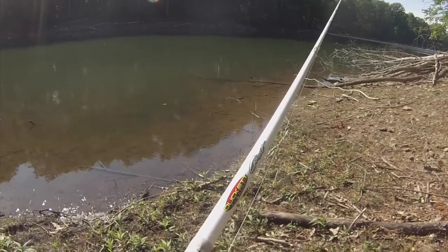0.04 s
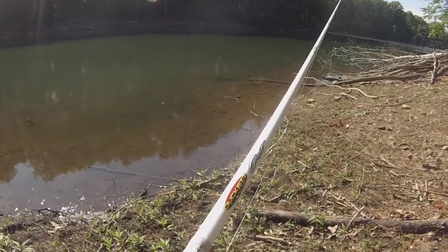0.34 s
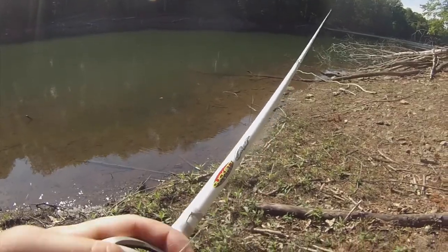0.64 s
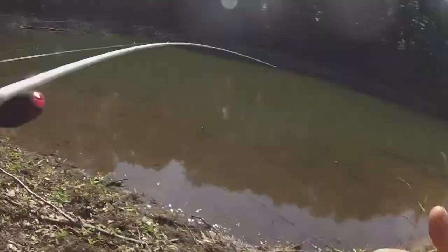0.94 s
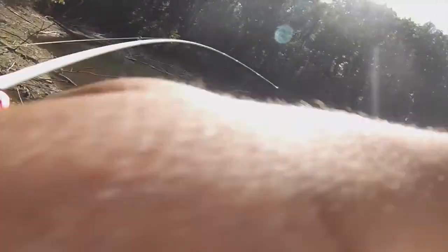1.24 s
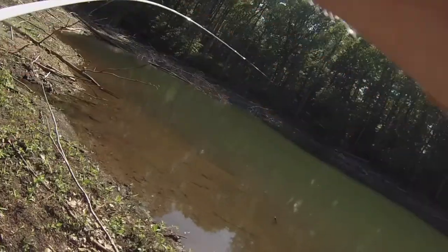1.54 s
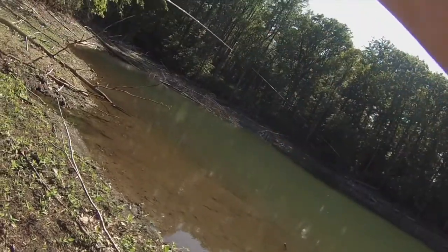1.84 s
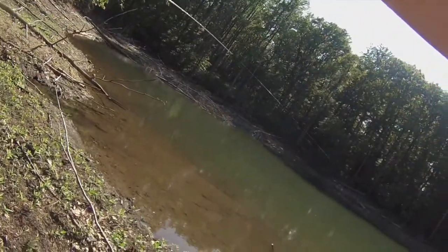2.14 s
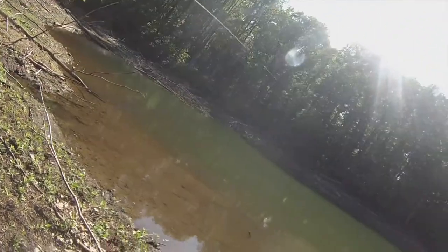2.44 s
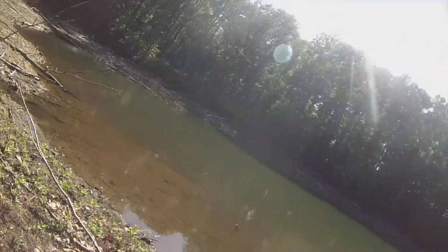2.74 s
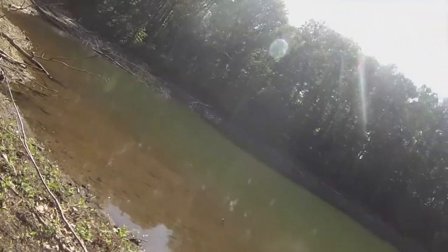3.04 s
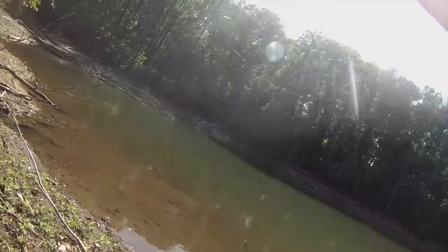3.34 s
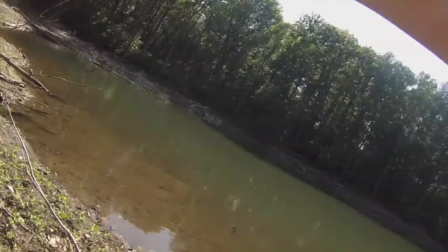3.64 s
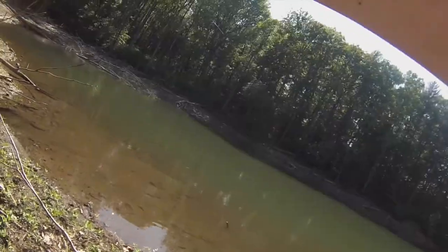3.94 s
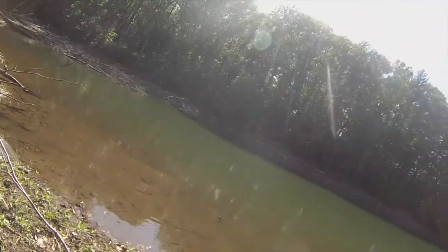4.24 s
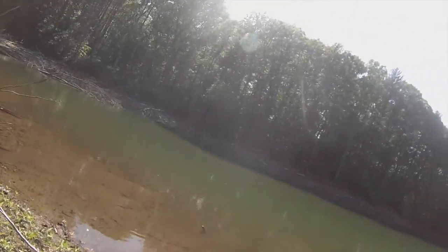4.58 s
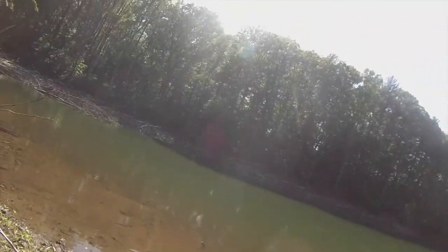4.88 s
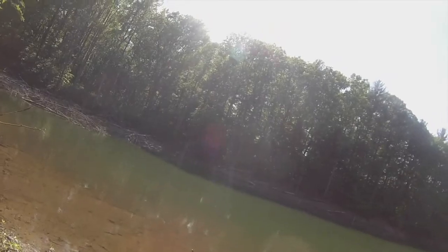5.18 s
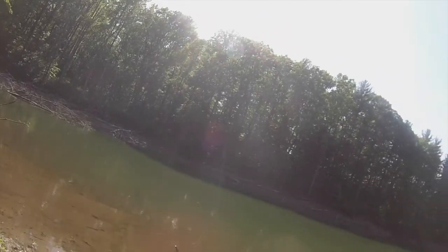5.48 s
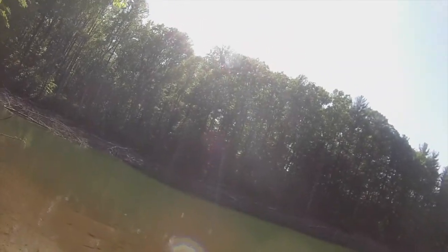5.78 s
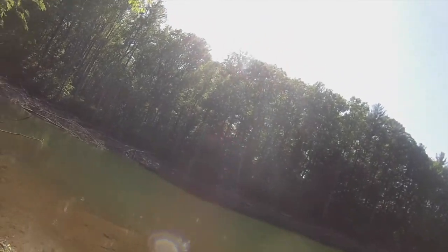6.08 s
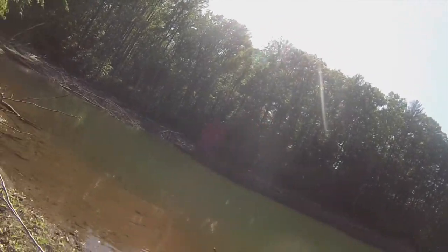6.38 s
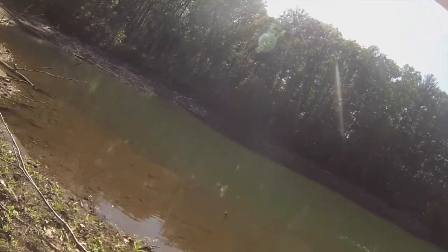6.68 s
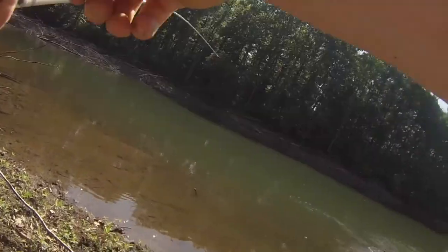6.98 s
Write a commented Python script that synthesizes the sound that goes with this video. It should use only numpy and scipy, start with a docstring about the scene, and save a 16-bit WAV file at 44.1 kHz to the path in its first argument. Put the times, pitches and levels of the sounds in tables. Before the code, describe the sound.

A fishing rod's handle and an arm knock sharply on the microphone's plastic case in two quick flurries, mixed with dull bumps and small reel ticks. Clothes swish and scrape across the case in three bouts. Between the second and third, the reel's spool gives a brief, thin whirr, and one more knock follows. Everything is very close and dry, over a faint woodland hush and light breeze rumble.

```python
"""On a quiet pond bank, an angler hooks a fish and plays it, with a camera strapped to the chest.
The rod's handle and an arm knock on the camera's plastic case in two quick flurries, with dull bumps
and ticks from the reel. Clothes swish and scrape over the case in three bouts of work with the rod.
The reel's spool whirrs briefly, and behind it all is a faint outdoor hush."""
import sys
import numpy as np
from scipy import signal
from scipy.fft import irfft
from scipy.io import wavfile
from scipy.ndimage import uniform_filter1d

SR = 44100
rng = np.random.default_rng(int(sys.argv[2]) if len(sys.argv) > 2 else 0)


def wav_record(signal):
    """Record a signal, one row per channel, as 16-bit PCM in the file named by sys.argv[1]."""
    frames = np.transpose(np.atleast_2d(signal))
    bounded = np.clip(frames, -1, 1)
    # unit amplitude maps onto the largest positive 16-bit level
    quanta = np.round(bounded * 32767).astype(np.int16)
    wavfile.write(sys.argv[1], SR, quanta)


N = 318346
TIME = np.arange(N) / SR
TAPS = 4096  # samples in one short sound, such as a knock
AGE = np.arange(TAPS) / SR  # seconds since that sound began
TOP_HZ = 15600  # treble above this is cut away


def knocks():
    """Each knock makes the plastic case ring with many tones; softer blows lose the high ones."""
    # Blows on the case. Each row: start in seconds, level in dB, treble limit in Hz,
    # looseness of the contact from 0 to 1, pitch in Hz that the struck spot favours.
    blows = [(0.8879, 0.5, 3020, 0.27, 1030), (.923, -26, 1440, 0.16, 880), (1.01, -11.5, 2870, 0.6, 1500),
             (1.0176, 3.5, 7500, 0.45, 685), (1.0208, -14, 2600, .4, 740), (1.028, -4.5, 3400, 0.5, 2130),
             (1.0987, -18, 1600, 0.8, 960), (1.135, -6, 3220, 0.23, 1410), (1.1502, -2, 4300, 0.47, 1400),
             (1.1943, -0.5, 2430, 0.07, 880), (1.275, -7, 2830, 0.23, 804), (1.3489, -0.5, 2660, 0.3, 1030),
             (1.5902, -15.5, 1870, 1, 1300), (1.612, -23, 4000, 0.3, 1010),
             (1.757, -21.5, 2180, 0.65, 1210), (1.7608, -21, 2320, 0.7, 710),
             (2.634, -28.5, 1720, 0.7, 910), (2.759, -28, 1810, 0.9, 1200), (3.2555, -22.5, 2550, 0.6, 800),
             (3.2972, -.5, 4140, .47, 3150), (3.4592, -7, 5100, 0.7, 1680), (3.489, -17, 2340, 0.35, 870),
             (3.551, -19, 2980, 0.6, 2400), (3.583, -10, 2640, 1, 2180), (3.677, -15.5, 1780, 0.45, 1210),
             (3.729, -27, 4070, 0.1, 3320), (5.151, -28, 2400, 1, 726), (5.172, -32, 2200, 1, 720),
             (5.988, -7, 4040, 0.38, 1070), (6.2098, -25, 1980, 0.4, 1150), (6.987, -24.5, 1930, 1, 1170),
             (6.999, -25, 2060, 1, 850)]
    # The case's own tones, low to high. Each row: pitch in Hz, level in dB, seconds to fade by 60 dB.
    case_tones = [(683, -6, 0.022), (787, 0, 0.01), (1279, -3.5, 0.011), (1790, -5.5, 0.014),
                  (2203, -5, 0.015), (2457, -3.5, 0.01), (2994, -10, 0.0085), (3244, -20, 0.04),
                  (3535, -15, 0.019), (4020, -12.5, 0.0047), (5180, -11, 0.0097), (6650, -14.5, 0.012),
                  (9040, -11, 0.016)]
    hz, db, fade_s = np.transpose(case_tones)[:, :, None]
    sign = (-1) ** np.arange(len(hz))[:, None]  # neighbours start opposite ways, so the ring swells
    out = np.zeros(N)
    for start, level_db, bright_hz, loose, spot_hz in blows:
        place, grip = rng.standard_normal((2, *hz.shape))  # no two blows ring quite alike
        favour_db = 3.5 * np.exp(-(np.log(hz / spot_hz) / 0.2) ** 2)
        fade_db = 60 * AGE / (fade_s * (0.68 + 0.55 * loose))
        tones = sign * np.sin(2 * np.pi * hz * (1 + 0.025 * grip) * AGE)
        ring = (gain_of(db + favour_db + 1.43 * place - fade_db) * tones).sum(0)
        ring = cut(cut(ring, 633, "high", order=4), bright_hz, "low", order=4)
        ring = peaked(signal.fftconvolve(ring, contact(loose))[:TAPS])
        nudge = peaked(cut(cut(burst(0.032), 410, "low"), 170, "high"))  # the whole case moves too
        knock = ring + gain_of(-33.5) * nudge
        add(out, start - 0.0005, gain_of(level_db - 1) * knock)  # early, as the wave must cross the case
    return out


def contact(loose):
    """A blow and its bounce cross the case as bending waves, treble first; a loose contact chatters."""
    hz = np.fft.rfftfreq(TAPS, 1 / SR)
    travel_s = 0.000992 * np.sqrt(1000 / (hz + 300))
    bounce_s = 0.000939 * (1 + 0.13 * rng.standard_normal())
    pair = 1 + 0.33 * np.exp(-2j * np.pi * hz * bounce_s)
    blow = irfft(pair * np.exp(-2j * np.pi * np.cumsum(travel_s) * hz[1]), TAPS)
    return blow + 1.46 * loose * burst(0.03) + gain_of(-11.5) * burst(0.029)


def bumps():
    """Padded blows give a short, hollow tone that sags in pitch; the low ones rustle more."""
    # The heavier bumps. Each row: start in seconds, level in dB, rough pitch in Hz.
    heavy_bumps = [(1.169, -21.5, 306), (1.229, -22, 392), (1.324, -20, 380), (1.384, -25, 400),
                   (2.875, -21, 1237), (3.122, -25, 594), (3.345, -27, 375), (3.676, -14.5, 490),
                   (4.614, -28.5, 397), (5.338, -30, 990), (5.696, -23.5, 1070), (6.153, -27, 740),
                   (6.16, -24, 347), (6.207, -16.5, 1115), (6.359, -20.5, 1120), (6.463, -26, 670),
                   (6.483, -24, 368), (6.539, -27.5, 280)]
    swell = (1 - np.exp(-AGE / 0.00049)) * np.exp(-AGE / 0.0029)
    sag = 0.863 + 0.17 * np.exp(-AGE / 0.0084)
    out = np.zeros(N)
    for start, level_db, hz in heavy_bumps + jostles():
        tone = np.sin(2 * np.pi * np.cumsum(hz * sag) / SR)
        rustle = cut(cut(burst(0.048), hz * 0.93, "low", order=3), hz * 1.05, "high")
        bump = peaked(swell * tone) + 200 / hz * peaked(rustle)
        add(out, start, gain_of(level_db - 3) * peaked(bump))
    return out


def jostles(per_s=11, low_hz=342, high_hz=1194, slot_s=0.02):
    """Extra rows of light bumps that come by chance, louder when the cloth presses harder."""
    slots = np.arange(0, N / SR - 0.1, slot_s)
    chance, late, softness, pitch = rng.random((len(slots), 4)).T
    start = slots + slot_s * late
    pressure_db, _ = movement(start)
    level_db = pressure_db + 13.5 - softness
    hz = low_hz * (high_hz / low_hz) ** pitch
    return list(np.transpose([start, level_db, hz])[chance < per_s * slot_s])


def ticks(bounce_s=0.0048):
    """Small hard parts of the reel and tackle catch on each other, bounce once and rattle briefly."""
    # The catches. Each row: start in seconds, level in dB, treble limit in Hz,
    # level of the bounce in dB compared with the catch.
    catches = [(1.215, -34, 9100, -3), (1.301, -29.5, 8950, -19), (1.418, -30.5, 14100, -17),
               (1.597, -19.5, 7000, -19), (1.6076, -14, 7400, 5), (2.885, -34, 11800, -20),
               (3.059, -30.5, 8060, -15), (3.7654, -31, 9500, -20), (4.612, -26, 8600, 7.5),
               (4.627, -24.5, 8200, -2.5), (4.639, -31, 6950, -5), (5.2032, -26.5, 6000, -5.5),
               (5.2307, -31, 4500, -15), (5.2723, -31, 6000, -14), (5.2958, -33, 4500, -9),
               (5.3327, -25.5, 6000, -2.5), (5.3565, -25.5, 7800, -6), (6.059, -27, 9000, 3)]
    # The tone colour of a tick. Each row: frequency in Hz, level in dB.
    tick_colour = [(120, -34), (200, -12), (761, -11), (998, -4), (1240, -4), (2800, -13.5), (3170, -3),
                   (3870, -6), (4160, -8.5), (4890, -4.5), (5450, -9.5), (6900, -16.5), (8880, -26.5),
                   (9900, -27), (15000, -37)]
    out, ring = np.zeros(N), ring_of(tick_colour)
    for start, level_db, bright_hz, bounce_db in catches:
        for at, db in (start, level_db), (start + bounce_s, level_db + bounce_db):
            snap = (burst(0.015) + gain_of(-14.5) * burst(0.095)) * (1 - np.exp(-AGE / 0.00069))
            snap += gain_of(19.5) * bright_hz / TOP_HZ * cut(snap, 10230, "high")
            tick = cut(signal.fftconvolve(snap, ring)[:TAPS], bright_hz, "low")
            add(out, at, gain_of(db - 1.5) * peaked(case_air(tick)))
    return out


def cloth():
    """Cloth rubs the case: pressure makes a swish, speed a hiss and fizz, and both a grainy scrape."""
    # The tone colours of the four layers of rubbing. Each row: frequency in Hz, level in dB.
    swish_colour = [(100, -21), (200, -7.5), (350, -1.5), (520, -2), (750, -1.5), (950, 4), (1170, 4),
                    (1500, -7.5), (2500, -20.5), (6000, -42)]
    scrape_colour = [(450, -35.5), (700, 8.5), (1100, -16), (1500, -5.5), (1800, -4), (2250, -1),
                     (2900, -5), (3350, -10.5), (4000, -22), (7000, -37.5)]
    hiss_colour = [(1500, -46.5), (3300, 6.5), (4200, 2), (4800, 0.5), (5700, -1), (7200, -5),
                   (9500, -10.5), (11000, -14.5), (13000, -17), (15500, -62)]
    fizz_colour = [(2500, -35), (5000, 11.5), (7000, 1), (9500, -2.5), (12000, -27), (15500, -22)]
    pressure_db, speed_db = movement(TIME)
    friction_db = 0.31 * pressure_db + 0.69 * speed_db
    swish = patchy(swish_colour, patch_db=4.5, flicker_db=1, streak_db=3)
    swish += 0.5 * grains(swish_colour, per_s=300, spread_db=3)
    scrape = patchy(scrape_colour, patch_db=1.5, flicker_db=4, streak_db=3.5)
    scrape += 0.79 * grains(scrape_colour, per_s=700, spread_db=1)
    crackle = grains(hiss_colour, per_s=2500, spread_db=4.5)
    hiss = patchy(hiss_colour, patch_db=3, flicker_db=4, streak_db=5.5) + 1.12 * crackle
    fizz = patchy(fizz_colour, patch_db=1.5, flicker_db=3, streak_db=6)
    layers = [(swish, 800, pressure_db + 0.26), (case_air(scrape), 2000, friction_db + 3.2),
              (case_air(hiss), 4550, speed_db + 4), (fizz, 8300, speed_db - 12)]
    out = np.zeros(N)
    for sound, centre_hz, steady_db in layers:
        power = gain_of(steady_db) ** 2 + strokes(centre_hz)
        out += evened(sound) * np.sqrt(power)
    return out


def movement(seconds):
    """How hard the cloth presses on the case and how fast it slides at the given times, both in dB."""
    # Three bouts of work with the rod. Each row: time in seconds, pressure in dB, sliding speed in dB.
    hook_set = [(.76, -59, -77), (.87, -51.5, -61), (.95, -47.5, -62), (1.06, -42, -52), (1.2, -41, -64),
                (1.36, -42.5, -65), (1.45, -47.5, -65.5), (1.76, -51.5, -59.5), (1.85, -56.5, -69.5)]
    wind_in = [(2.52, -63, -72.5), (2.58, -52.5, -63), (3.05, -51, -59), (3.28, -45, -56.5),
               (3.47, -39.5, -56), (3.76, -38.5, -57.5), (3.99, -49.5, -60.5), (4.26, -52.5, -62.5),
               (4.33, -58, -69.5)]
    lift = [(5.57, -63, -71), (5.83, -42.5, -67), (6.039, -46, -64), (6.08, -39, -59), (6.36, -40.5, -53),
            (6.64, -42.5, -54.5), (6.77, -49.5, -57), (7.06, -45.5, -61.5), (7.22, -49, -60.5)]
    at, pressure_db, speed_db = np.transpose(hook_set + wind_in + lift)
    return np.interp(seconds, at, pressure_db), np.interp(seconds, at, speed_db)


def strokes(layer_hz):
    """Folds of cloth slip past, each adding a swell of power, most to the layers near its own pitch."""
    # The folds. Each row: loudest moment in seconds, rise time in seconds, level in dB, pitch in Hz.
    folds = [(0.801, 0.026, -50.5, 1820), (.9, .06, -45, 1730), (1.002, 0.051, -40, 1780),
             (1.05, 0.16, -58, 9000), (1.399, 0.017, -34.5, 2630), (1.401, .025, -43, 12000),
             (1.622, 0.075, -40, 1210), (1.766, 0.048, -38.5, 800), (2.14, 0.065, -57.5, 2100),
             (2.345, 0.063, -55, 1700), (2.445, 0.029, -55, 2320), (2.572, .025, -62, 9000),
             (2.638, 0.14, -47.5, 1970), (2.85, 0.044, -49.5, 2200), (3.205, .06, -41, 2400),
             (3.439, 0.04, -35.5, 2300), (3.674, 0.052, -44.5, 5960), (3.937, 0.057, -46.5, 5100),
             (5.166, 0.063, -48, 750), (5.286, .035, -41.5, 1270), (5.355, 0.064, -41.5, 1070),
             (5.67, 0.027, -53.5, 1700), (6.068, 0.013, -39, 7550), (6.068, .025, -36.5, 700),
             (6.103, 0.049, -46, 4300), (6.21, 0.067, -49.5, 3800), (6.344, 0.034, -46, 4000),
             (6.644, 0.057, -48.5, 6000)]
    power = np.zeros(N)
    for middle, rise_s, db, hz in folds:
        swell = signal.windows.hann(round(2 * rise_s * SR))
        octaves_away = abs(np.log2(hz / layer_hz))
        add(power, middle - rise_s, (swell * gain_of(db + 2 - 10.5 * octaves_away ** 1.24)) ** 2)
    return power


def grains(colour, per_s, spread_db):
    """Fibres make tiny slips of uneven size at random times, each ringing with the same tone colour."""
    size = gain_of(spread_db * np.minimum(rng.exponential(1, N), 4)) * rng.choice([-1, 1], N)
    slips = size * (rng.random(N) < per_s / SR)
    return evened(signal.oaconvolve(slips, ring_of(colour))[:N])


def case_air(x):
    """The air inside the case rings along with a sound at a few narrow pitches."""
    # The air's own tones. Each row: pitch in Hz, width in Hz, level in dB.
    air_tones = [(2200, 110, -8), (3370, 81, -14), (4750, 220, -7.5), (5420, 110, -6), (6190, 101, -15),
                 (9250, 250, -15)]
    return x + sum(gain_of(db) * signal.lfilter(*signal.iirpeak(hz, hz / width, fs=SR), x)
                   for hz, width, db in air_tones)


def spool(start_s=4.63, length_s=0.77, start_db=-59.5, fade_db_per_s=17):
    """The reel's spool spins with a thin whirr that dies down."""
    # The whirr's tone colour, a few narrow peaks. Each row: frequency in Hz, level in dB.
    whirr_colour = [(1500, -25), (2500, 0), (2850, 2), (3100, -1), (3380, 5), (3900, -21), (4900, 0),
                    (5600, -26), (7200, -11), (10000, -36)]
    age = TIME - start_s
    running = np.clip(np.minimum(age, length_s - age) / 0.022, 0, 1)
    whirr = patchy(whirr_colour, patch_db=3.5, flicker_db=4)
    return running * gain_of(start_db - fade_db_per_s * abs(age)) * whirr


def outdoors(hush_db=-54, breeze_db=-50.5, ease_db_per_s=0.08):
    """The woods give a steady hush; light air rumbles on the microphone and slowly eases."""
    # The tone colours of the woods and the breeze. Each row: frequency in Hz, level in dB.
    hush_colour = [(88, -21), (150, -5.5), (213, -6), (263, -2.5), (326, -8.5), (420, -5), (500, -6.5),
                   (844, -7), (1370, -17.5), (2550, -24), (4560, -30.5), (14300, -41), (15500, -43)]
    rumble_colour = [(8.8, -17), (15, -4), (54, 5), (170, -8.5), (220, -45), (370, -120)]
    hush = patchy(hush_colour, patch_db=1.9, flicker_db=-0.7)
    rumble = patchy(rumble_colour, patch_db=1.4, flicker_db=1.4)
    return gain_of(hush_db) * hush + gain_of(breeze_db - ease_db_per_s * TIME) * rumble


def patchy(colour, patch_db, flicker_db, streak_db=0):
    """Noise whose tone colour drifts in broad patches and narrow, lasting streaks; its level flickers."""
    frames, hz = N // 256 + 5, np.fft.rfftfreq(1024, 1 / SR)
    real, imag, patches, streaks = rng.standard_normal((4, frames, len(hz)))
    patches = uniform_filter1d(uniform_filter1d(patches, size=7, axis=0), size=14, axis=1)
    streaks = uniform_filter1d(uniform_filter1d(streaks, size=28, axis=0), size=4, axis=1)
    flicker = uniform_filter1d(rng.standard_normal(frames), size=4)[:, None]
    drifts = (patch_db, patches), (streak_db, streaks), (flicker_db, flicker)
    drift_db = sum(db * np.clip(evened(drift), -2, 2) for db, drift in drifts)
    spectrum = (real + 1j * imag) * gain_of(level_at(colour, hz) + drift_db)
    _, noise = signal.istft(spectrum.T, nperseg=1024, noverlap=768)
    return evened(noise[:N])


def burst(fade_s):
    """A puff of noise that fades by 60 dB in the given time."""
    noise = rng.standard_normal(TAPS) * gain_of(-60 * AGE / fade_s)
    return noise / np.linalg.norm(noise)


def ring_of(colour):
    """The short ring of a single click with the given tone colour."""
    log_gain = np.log(gain_of(level_at(colour, abs(np.fft.fftfreq(TAPS, 1 / SR)))))
    return np.fft.ifft(np.exp(np.conj(signal.hilbert(log_gain)))).real


def level_at(colour, hz):
    """A tone colour's level in dB at any frequency, found by joining its points."""
    point_hz, db = np.transpose(colour)
    return np.interp(np.log(hz + 1), np.log(point_hz + 1), db)


def cut(x, hz, keep, order=2):
    """Keeps the "low" or the "high" side of a frequency."""
    return signal.sosfilt(signal.butter(order, hz, keep, fs=SR, output="sos"), x)


def add(mix, start_s, sound):
    """Puts a sound into the mix at the given time."""
    part = mix[round(start_s * SR):][:len(sound)]
    part += sound[:len(part)]


def gain_of(db):
    """Turns decibels into a number to multiply by."""
    return 10 ** (np.asarray(db) / 20)


def evened(x):
    """Scales a sound to an average power of 1."""
    return x / np.sqrt(np.mean(x ** 2) + 1e-20)


def peaked(x):
    """Scales a sound to a peak of 1."""
    return x / (abs(x).max() + 1e-12)


def scene():
    """All the sounds in one channel, close by and in the open air, so with no echo."""
    return (knocks() + ticks() + cloth() + spool() + outdoors() + bumps())[None]


def record(dry):
    """The loudest peaks overload and are flattened; then the highest treble is cut away."""
    clipped = np.clip(dry, -0.92, 0.92)
    low_pass = signal.firwin(401, TOP_HZ, window=("kaiser", 9), fs=SR)
    return signal.oaconvolve(clipped, low_pass[None], "same")


dry = scene()
out = record(dry)
wav_record(out)
```